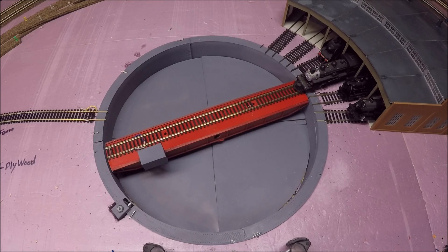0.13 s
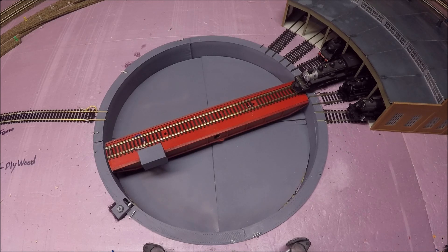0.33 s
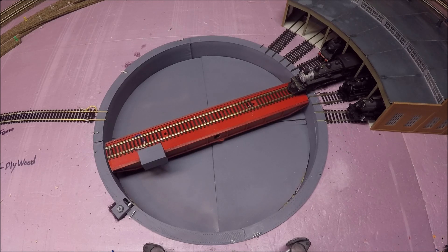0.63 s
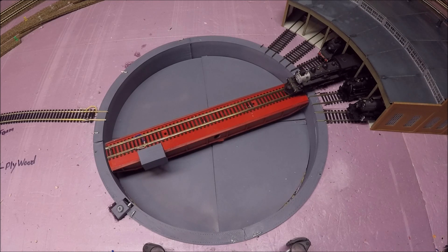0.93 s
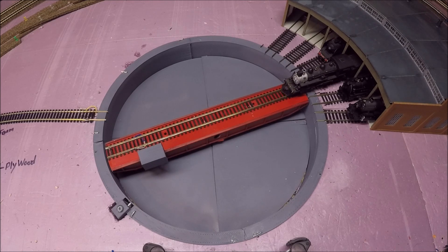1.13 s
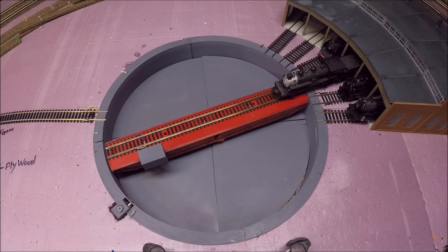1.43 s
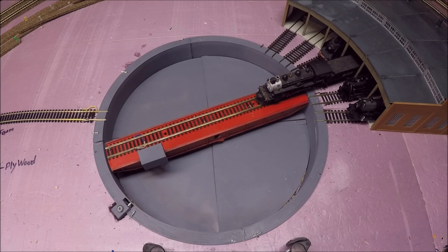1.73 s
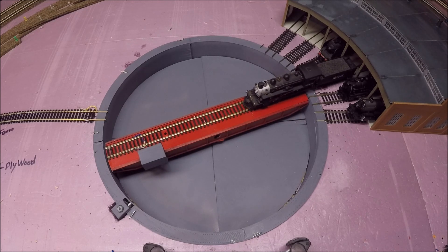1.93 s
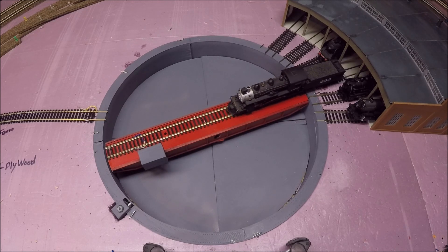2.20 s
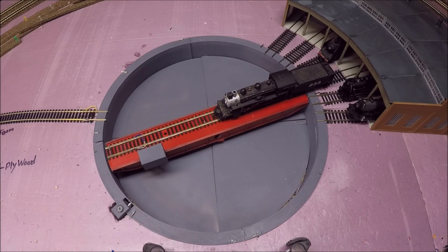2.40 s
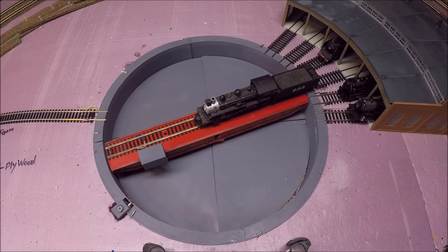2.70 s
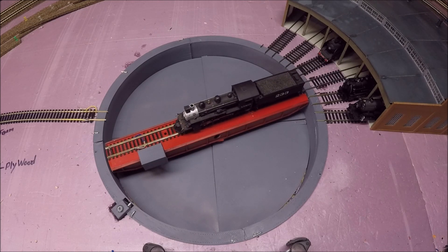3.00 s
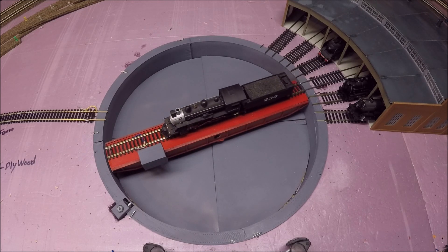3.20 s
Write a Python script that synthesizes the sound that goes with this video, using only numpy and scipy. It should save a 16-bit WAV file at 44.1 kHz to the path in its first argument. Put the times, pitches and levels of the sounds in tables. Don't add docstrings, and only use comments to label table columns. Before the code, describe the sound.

A deep, pulsing hum dominates a quiet room, swelling, surging faster, then thinning. Midway a model locomotive rolls onto a turntable bridge with soft rumble, irregular clicks, hollow thumps and faint buzzing, heard by one microphone.

```python
import sys
import numpy as np
from scipy import signal
from scipy.fft import rfft, irfft
from scipy.io import wavfile
from scipy.ndimage import uniform_filter1d

SR = 44100
rng = np.random.default_rng(int(sys.argv[2]) if len(sys.argv) > 2 else 0)


def unload_audio(sound):
    columns = np.transpose(np.atleast_2d(sound))
    steps = np.round(np.clip(columns, -1, 1) * 32767)
    wavfile.write(sys.argv[1], SR, steps.astype(np.int16))


def convert_level_to_amplitude(level_db):
    exponent = np.asarray(level_db, float) / 20
    return 10 ** exponent


N = 147735

# start_s, motor_speed [turns per s], rolling_level_db
LOCO_RUN = [
    (0, 29, -68.5),
    (1.15, 34, -65),
    (1.45, 34, -56),
    (1.75, 35, -55),
    (2.1, 32, -54),
    (2.4, 35.4, -55),
    (2.7, 36, -56),
    (2.9, 34, -57),
    (3.15, 27, -59),
    (3.35, 34, -61),
]


def unit(x):
    return x / np.sqrt(np.mean(x ** 2))


def curve(rows, axis=1):
    rows = np.array(rows, float)
    return np.interp(np.arange(N) / SR, rows[:, 0], rows[:, axis])


def band(x, hz, width):
    return signal.lfilter(*signal.iirpeak(hz, hz / width, fs=SR), x)


def walk(rate_hz):
    hold = int(SR / rate_hz)
    steps = np.repeat(rng.standard_normal(N // hold + 1), hold)
    return 0.91 * uniform_filter1d(uniform_filter1d(steps, hold), hold)[:N]


def coloured(points, x, flicker_db):
    points = np.array(points, float)
    hz = np.maximum(np.arange(N // 2 + 1) * SR / N, 1)
    shape_db = np.interp(np.log(hz), np.log(points[:, 0]), points[:, 1], left=-90)
    spectrum = rfft(x) * convert_level_to_amplitude(shape_db)
    out = 0
    for octave in np.arange(7, 14.5, .5):
        share = np.clip(1 - 2 * np.abs(np.log2(hz) - octave), 0, 1)
        out = out + irfft(spectrum * share, N) * convert_level_to_amplitude(flicker_db * walk(9.55))
    return unit(out)


def room_air():
    # pitch_hz, level_db [per Hz]
    air_colour = [(76, 14.5), (118, -6), (141, -13.5), (218, -16), (420, -31), (473, -31), (3250, -50.5),
                  (10500, -49), (15000, -68)]
    # pitch_hz, level_db
    whine_tones = [
        (8210, -80),
        (12290, -92),
    ]
    t = np.arange(N) / SR
    whine = 0
    for hz, db in whine_tones:
        whine = whine + np.sqrt(2) * convert_level_to_amplitude(db) * np.sin(2 * np.pi * hz * t + 0.65 * walk(18))
    return convert_level_to_amplitude(-41.5) * coloured(air_colour, rng.standard_normal(N), 1.0) + whine


def singing_parts():
    # start_s, length_s, pitch_hz, width_hz, level_db
    part_rings = [(1.33, 0.37, 300, 20, -44), (1.67, 0.264, 303, 28, -45), (1.697, .3, 465, 34, -52.5),
                  (1.697, 0.22, 410, 41, -55), (2.18, 0.16, 455, 54, -51.5), (2.14, 0.48, 380, 69, -52),
                  (2.618, 0.42, 350, 65, -51.5), (2.95, 0.61, 460, 53, -55), (3.0, 0.27, 360, 56, -57.5),
                  (3.1, 0.28, 183, 48, -45.5), (2.675, .25, 195, 54, -42), (2.89, .05, 826, 60, -55),
                  (1.88, 0.34, 105, 10, -39.5), (2.7, .06, 295, 115, -42.5), (2.1, 0.66, 1364, 90, -65),
                  (2.947, 0.33, 1400, 90, -67), (0.21, 0.14, 270, 50, -60), (0.9, 0.21, 224, 65, -48),
                  (1.44, 0.074, 6350, 120, -64), (1.62, 0.17, 6750, 300, -69), (1.95, .5, 6400, 200, -72),
                  (2.34, 0.97, 6600, 250, -69.5), (1.13, .35, 7400, 900, -67), (1.62, .15, 8000, 500, -67),
                  (2.8, 0.39, 8100, 350, -74)]
    flutter_db = 3
    out = 0
    for start, length, hz, width, db in part_rings:
        progress = np.clip((np.arange(N) / SR - start) / length, 0, 1)
        swell = np.sqrt(np.abs(np.sin(np.pi * progress)))
        ring = unit(band(band(rng.standard_normal(N), hz, width), hz, 2 * width))
        out = out + convert_level_to_amplitude(db + flutter_db * walk(25.15)) * swell * ring
    return out


def flange_squeak():
    # start_s, length_s, low_pitch_hz, high_pitch_hz, level_db
    rub = (1.98, .062, 3400, 3600, -54.5)
    chatter_db, wobble_hz = 3, 55
    start, length, low_hz, high_hz, db = rub
    progress = np.clip((np.arange(N) / SR - start) / length, 0, 1)
    hz = low_hz + (high_hz - low_hz) * progress ** 2
    hz = hz + wobble_hz * walk(370) * (1 + 2 * progress ** 2)
    swell = np.abs(np.sin(np.pi * progress) * np.cos(np.pi * (progress - .17))) ** .5
    return convert_level_to_amplitude(db + chatter_db * walk(256)) * swell * np.sin(2 * np.pi * np.cumsum(hz) / SR)


def rail_joints():
    # start_s, peak_db, ring_pitch_hz, brightness_db
    wheel_clicks = [(.446, -43, 875, -14.5), (1.227, -48.5, 1630, 10.5), (1.255, -37, 1430, -2),
                    (1.369, -46, 2560, -2), (1.427, -52, 2170, 10), (1.488, -43, 2220, 3),
                    (1.568, -41, 3270, 2), (1.472, -46, 1210, -1), (1.322, -52, 1090, -3),
                    (1.764, -44, 1480, 6), (1.811, -50.5, 2480, 15.5), (1.884, -36.5, 900, -1),
                    (2.026, -37.5, 3440, -8), (2.079, -30, 910, -8), (2.219, -38, 1320, 0),
                    (2.289, -44.5, 1550, 5), (2.371, -31.5, 770, -6.5), (2.527, -39.5, 1340, 5),
                    (2.647, -40, 2380, -9), (2.872, -34.5, 870, -2), (2.873, -37, 2380, -22),
                    (2.967, -38, 2220, -16), (3.055, -43.5, 1740, 7), (3.089, -40, 1410, -4),
                    (1.988, -42, 1500, 0), (2.579, -36, 1390, -7), (2.683, -42, 1144, 0),
                    (3.16, -43, 1380, 0), (2.12, -43, 2900, -4)]
    # start_s, peak_db, pitch_hz
    bridge_thumps = [(1.572, -25.5, 146), (1.572, -29.5, 277), (1.58, -32.5, 220), (1.835, -33, 140),
                     (2.3, -26.5, 143.5), (2.219, -42, 444.4), (2.721, -29, 263), (2.875, -34, 283),
                     (2.869, -42, 870), (3.2, -52.5, 810), (1.75, -40.5, 384), (3.2, -38, 340),
                     (2.5, -36, 370), (1.75, -40, 207), (2.944, -34, 183), (3, -26, 165.6), (1.6, -49, 340)]
    crack_s, ring_s, thump_s = .007, .008, .013
    click_db, ring_db = -7.5, -2
    length = 8192
    out = np.zeros(N + length)
    t = np.arange(length) / SR
    rise = 1 - np.exp(-t / 0.0013)
    for start, db, hz, bright_db in wheel_clicks:
        noise = rng.standard_normal(length)
        ring = unit(band(noise, hz, hz / 7) + band(noise, hz, hz / 40))
        ring = convert_level_to_amplitude(ring_db) * ring * np.exp(-t / ring_s)
        crack = unit(band(band(noise, 1700, 3300), 1700, 3300))
        crack = convert_level_to_amplitude(bright_db) * crack * np.exp(-t / crack_s)
        first = int(start * SR)
        out[first:first + length] += convert_level_to_amplitude(db + click_db) * rise * (crack + ring)
    for start, db, hz in bridge_thumps:
        swell = 2 * t / thump_s * np.exp(1 - 2 * t / thump_s)
        first = int(start * SR)
        out[first:first + length] += convert_level_to_amplitude(db) * swell * np.sin(2 * np.pi * hz * t)
    return out[:N]


def motor_brushes():
    # start_s, level_db
    brush_level = [
        (1.25, -90),
        (1.5, -76),
        (1.8, -72),
        (2.3, -70.5),
        (2.5, -67.5),
        (2.9, -67.5),
        (3.18, -68),
        (3.24, -82),
    ]
    # pitch_hz, width_hz, level_db
    metal_rings = [
        (6300, 450, 0),
        (6750, 300, -5),
        (8100, 700, 0),
        (7500, 400, -5),
    ]
    t = np.arange(N) / SR
    motor_turn = np.cumsum(curve(LOCO_RUN)) / SR
    gate = np.exp(-(6 * motor_turn % 1) / .6) * (1 + .4 * np.sign(3 * motor_turn % 1 - .5))

    sizzle_hz = 13350 + 800 * np.clip(t - 2.6, -1, .2)
    low_noise = signal.lfilter(*signal.butter(2, 350, fs=SR), rng.standard_normal(N))
    sizzle = unit(gate * low_noise * np.cos(2 * np.pi * np.cumsum(sizzle_hz) / SR))

    tick_hz, tick_width_hz, scatter_db = 14600, 2500, 2.5
    tick_size = convert_level_to_amplitude(scatter_db * rng.standard_normal(N // 100))[motor_turn.astype(int)]
    tick = np.exp(-(motor_turn % 1) / .07) * tick_size * rng.standard_normal(N)
    tick = unit(band(band(tick, tick_hz, tick_width_hz), tick_hz, tick_width_hz))

    noise = rng.standard_normal(N) * (1 + gate)
    rings = 0
    for hz, width, db in metal_rings:
        rings = rings + convert_level_to_amplitude(db + 1.5 * walk(4.0)) * unit(band(noise, hz, width))
    return (convert_level_to_amplitude(-1.5) * sizzle + convert_level_to_amplitude(-6) * tick + convert_level_to_amplitude(0.5) * rings) * convert_level_to_amplitude(curve(brush_level))


def rolling_wheels():
    # pitch_hz, level_db [per Hz]
    roll_colour = [(76, -28), (130, -17), (158, 0), (464, -16), (543, -22), (1360, -21.5), (8250, -40),
                   (11100, -53), (14000, -45)]
    # pitch_hz, width_hz, level_db
    shell_notes = [
        (305, 35, -2),
        (470, 45, -7),
        (860, 60, -19),
        (1360, 70, -11),
        (1750, 400, -10),
        (2450, 150, -18),
        (3470, 200, -19),
        (200, 50, 0),
    ]
    grit_per_s, grit_db, grit_spread_db = 200, -10, 1.5
    grit_hits = (rng.random(N) < grit_per_s / SR) * convert_level_to_amplitude(grit_spread_db * rng.exponential(1, N))
    fade = np.exp(-1 / (0.0049 * SR))
    grit = signal.lfilter([1], [1, -fade], grit_hits) * rng.standard_normal(N)

    motor_turn = np.cumsum(curve(LOCO_RUN)) / SR
    gear_knock = 1 + .4 * np.exp(-(motor_turn % 1) * 5)
    rough = rng.standard_normal(N) * gear_knock * convert_level_to_amplitude(1.2 * walk(39.96))
    rough = rough + convert_level_to_amplitude(grit_db) * unit(grit)

    shell = 0
    for hz, width, db in shell_notes:
        shell = shell + convert_level_to_amplitude(db + 3.5 * walk(6.76)) * unit(band(rough, hz, width))
    wheels = convert_level_to_amplitude(9.5) * coloured(roll_colour, rough, 2.0)
    return (wheels + shell) * convert_level_to_amplitude(curve(LOCO_RUN, axis=2))


def machine_run(speed, level, orders, start_turn, swells):
    machine_turn = start_turn + np.cumsum(curve(speed)) / SR
    out = 0
    for order, db in orders.items():
        wander_db = (1 if db > -13 else 4) * walk(4)
        phase = 2 * np.pi * (order * machine_turn + .1075 * order * order)
        out = out + swells.get(order, 1) * convert_level_to_amplitude(db + wander_db) * np.cos(phase)
    return np.sqrt(2) * out * convert_level_to_amplitude(curve(level))


def table_hum():
    # start_s, speed [turns per s]
    idle_speed = [(0, 11.65), (.3, 11.93), (.52, 11.62), (.87, 11.86), (1.3, 11.65), (1.55, 11.75)]
    surge_speed = [(1.6, 15.1), (1.85, 15.2), (1.95, 16.2), (2.17, 17.2), (2.3, 17), (2.45, 16), (2.6, 15),
                   (2.9, 14.35)]
    cruise_speed = [(2.8, 13.55), (3.35, 13.4)]
    bridge_speed = [(1.9, 15.8), (2.0, 15.2), (2.1, 15.6), (2.2, 16), (2.36, 16.5), (2.46, 14.8)]
    # start_s, level_db
    idle_level = [
        (0, -19.5),
        (.2, -18.5),
        (.55, -17.5),
        (.95, -16.5),
        (1.12, -15.5),
        (1.561, -13),
        (1.6, -24),
        (1.8, -38.5),
        (1.9, -42),
    ]
    surge_level = [(1.55, -63), (1.7, -35), (1.801, -16.5), (1.88, -26.5), (1.94, -24.5), (2.099, -36.5),
                   (2.25, -32), (2.42, -23), (2.6, -22), (2.64, -29.5), (2.67, -19.5), (2.71, -24.5),
                   (2.74, -22), (2.9, -20.5), (3.029, -49)]
    cruise_level = [
        (2.78, -55),
        (2.9, -28.5),
        (3.0, -32),
        (3.2, -29),
        (3.35, -28.5),
    ]
    bridge_level = [
        (1.8, -72),
        (1.9, -54),
        (2.1, -37),
        (2.2, -45),
        (2.351, -46.5),
        (2.43, -39),
        (2.5, -49),
    ]
    idle_orders = {2: -28, 3: -27, 4: -8.5, 5: 0, 6: -23, 7: -22, 8: -17, 9: -8.5, 10: -26, 12: -36, 14:
                   -36}
    surge_orders = {2: -26, 3: -12.5, 4: 0, 5: -12, 6: -22, 7: -30}
    cruise_orders = {3: -16, 4: 0, 5: -5, 6: -16, 7: -16, 8: -2, 11: -20}
    bridge_orders = {10: 0}
    # start_s, level_db
    ninth_swell = [(0, -9), (.25, 3.5), (.5, -1.5), (.75, -0.5), (1.0, 1.5), (1.2, 1), (1.55, -1.5),
                   (1.7, 8.5)]
    # pitch_hz, width_hz, level_db
    table_rumble = [
        (32, 16, -27),
        (43, 14, -24),
        (85, 30, -24),
        (125, 30, -36),
    ]

    t = np.arange(N) / SR
    dips = sum(np.exp(-((t - dip_s) / .07) ** 2) for dip_s in (.27, .87))
    idle_swells = {4: 1 - .85 * dips, 9: convert_level_to_amplitude(curve(ninth_swell))}
    tones = machine_run(idle_speed, idle_level, idle_orders, .375, idle_swells)
    tones = tones + machine_run(surge_speed, surge_level, surge_orders, .276, {})
    tones = tones + machine_run(cruise_speed, cruise_level, cruise_orders, .2934, {})
    tones = tones + machine_run(bridge_speed, bridge_level, bridge_orders, .276, {})

    rumble = 0
    for hz, width, db in table_rumble:
        rumble = rumble + convert_level_to_amplitude(db) * unit(band(band(rng.standard_normal(N), hz, width), hz, width))
    levels = (idle_level, surge_level, cruise_level, bridge_level)
    drive = np.maximum(sum(convert_level_to_amplitude(curve(level)) for level in levels), convert_level_to_amplitude(-18.0))
    return tones + rumble * drive


def scene():
    background = room_air() + singing_parts()
    locomotive = flange_squeak() + rail_joints() + motor_brushes() + rolling_wheels()
    return (background + locomotive + table_hum())[None]


def band_limit(x):
    return signal.sosfilt(signal.butter(12, 15150, fs=SR, output="sos"), x)


def record(dry):
    limit = 0.61
    mix = limit * np.tanh(dry / limit)
    return band_limit(mix)


dry = scene()
out = record(dry)
unload_audio(out)
```